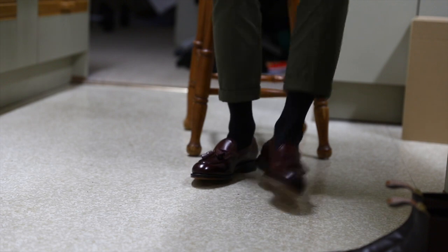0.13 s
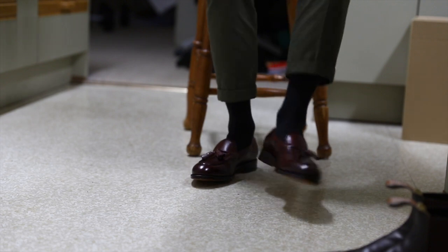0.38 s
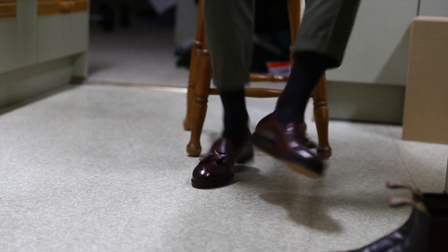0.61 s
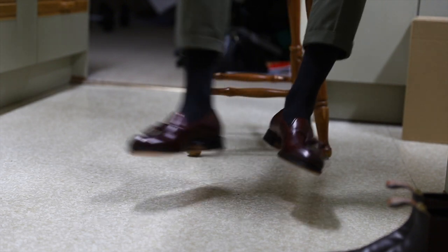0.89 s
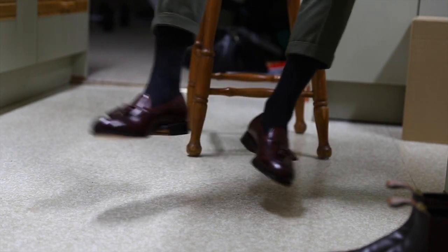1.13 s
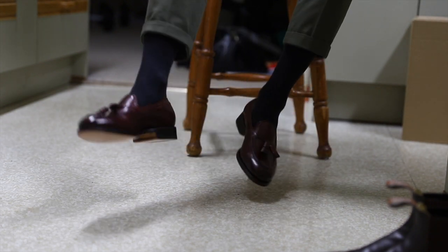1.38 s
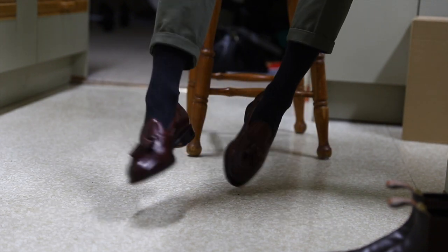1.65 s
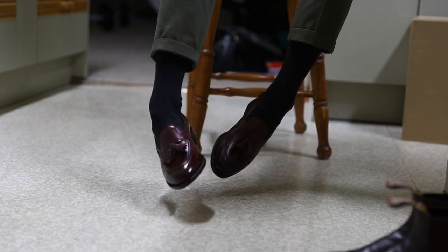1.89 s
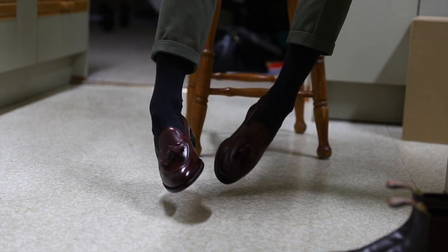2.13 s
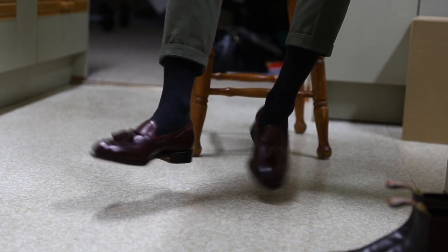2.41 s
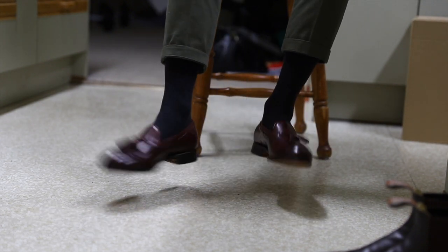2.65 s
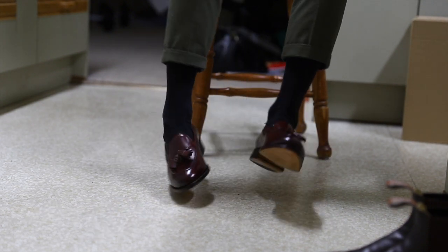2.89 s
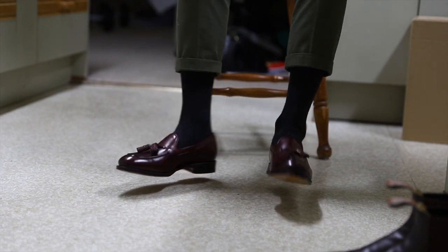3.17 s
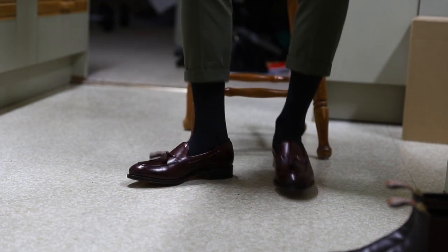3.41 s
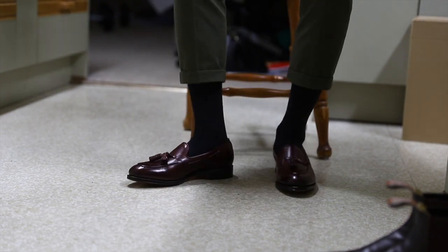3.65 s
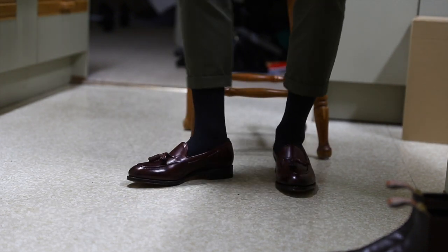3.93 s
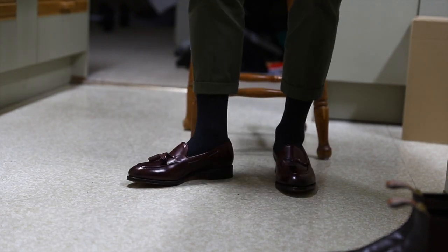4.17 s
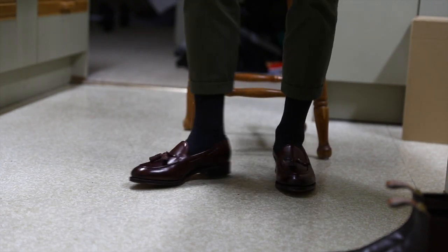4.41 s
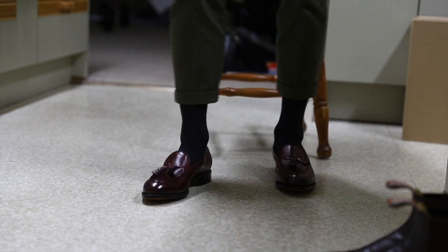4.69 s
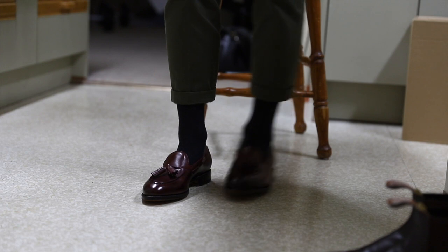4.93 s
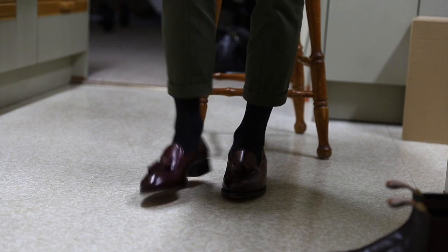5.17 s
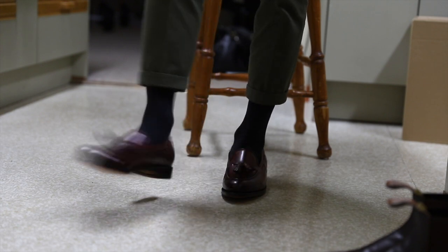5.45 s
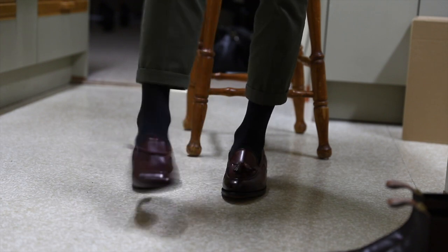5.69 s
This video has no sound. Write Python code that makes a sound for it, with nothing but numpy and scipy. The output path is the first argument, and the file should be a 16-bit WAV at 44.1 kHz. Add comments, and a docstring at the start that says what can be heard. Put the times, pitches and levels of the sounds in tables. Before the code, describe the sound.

Leather shoes land on a hard kitchen floor in a loud quick cluster, between faint cloth rustles, scuffs, a wooden creak-knock and softer steps.

```python
"""A pair of leather shoes is lifted, swung and set down by someone on a wooden stool in a small hard-floored
room. Heels and soles strike the floor: filtered impulses crack and slap, and decaying sines ring the room's low
modes. The stool's joints knock as short rattles through damped wooden modes; leather ticks and a few dull
knocks of the soles sound as brief rounded rings. Cloth and soles rustle and scuff as sparse noise grains, which
also give some knocks and a snap their bright edge; filtered noise gives a soft room hiss and rumble below."""
import sys
import numpy as np
from scipy import signal
from scipy.fft import rfft, irfft, next_fast_len
from scipy.io import wavfile

SR = 44100
rng = np.random.default_rng(int(sys.argv[2]) if len(sys.argv) > 2 else 0)


def attenuation_scalar(level_db):
    """Turn a level in dB into a linear amplitude multiplier (20 dB per decade)."""
    decades = np.asarray(level_db, float) / 20
    return 10 ** decades


def store_pcm(level_fs):
    """Save levels as 16-bit WAV."""
    pcm = np.round(np.clip(level_fs, -1, 1) * 32767).astype(np.int16)
    wavfile.write(sys.argv[1], SR, np.atleast_2d(pcm).T)


N = 256954

# heel or sole meets the floor, relative strengths of the sole's slap, the hard edge's knock and the weight's thud:
# (time [s], slap [dB], knock [dB], thud [dB])
FOOTFALLS = [(.004, -39.5, -42.5, -34.5), (.362, -38.5, -37, -51), (.554, -34, -31, -23),
             (.574, -30, -35, -32.5), (0.597, -50, -32, -28.5), (3.5079, -14, -11, -20.5),
             (3.5184, -14, -42, -21), (3.5589, -13, -13.5, -47), (3.569, -9, -46, -31),
             (3.580, -13, -44, -33), (3.6122, -15, -51, -42), (3.644, -36, -37, -31),
             (3.699, -27, -30.5, -56), (4.628, -40, -56, -43), (4.6988, -20, -17, -26),
             (4.7121, -16.5, -58, -37), (4.755, -31.5, -49, -36), (5.079, -30, -39.5, -27.5),
             (5.1, -22, -26, -30), (5.114, -21.5, -63, -37), (5.164, -34, -61, -46)]


def rms_one(x):
    """Normalisation of power: scales to unit rms."""
    return x / np.sqrt(np.mean(x ** 2) + 1e-20)


def at_hz(points, hz):
    """Interpolation of a spectrum table on a logarithmic frequency axis."""
    table_hz, values = np.array(points).T
    return np.interp(np.log(hz + 1), np.log(table_hz), values)


def coloured(x, spectrum):
    """Linear filtering: multiplies the Fourier spectrum by a table of (frequency [Hz], gain [dB])."""
    size = next_fast_len(x.shape[-1])
    hz = np.fft.rfftfreq(size, 1 / SR)
    shaped = rfft(x, size) * attenuation_scalar(at_hz(spectrum, hz))
    return irfft(shaped, size)[..., :x.shape[-1]]


def band_pass(x, low, high):
    """Butterworth band-pass filtering, maximally flat between its edges in Hz."""
    edges = [max(low, 20), min(high, .45 * SR)]
    return signal.sosfilt(signal.butter(2, edges, "band", fs=SR, output="sos"), x)


def drift(rate):
    """Slow random fluctuation: one-pole low-pass noise with its corner at rate [Hz], unit rms."""
    knots_per_s = 60
    knots = rng.standard_normal(int(N / SR * knots_per_s) + 2)
    r = np.exp(-2 * np.pi * rate / knots_per_s)
    slow = rms_one(signal.lfilter([1], [1, -r], knots))
    return np.interp(np.arange(N) / SR * knots_per_s, np.arange(len(slow)), slow)


def swells(rows):
    """Gaussian envelopes: a sum of bell-shaped gains from (time [s], level [dB], half length [s])."""
    t = np.arange(N) / SR
    return sum(attenuation_scalar(db) * np.exp(-((t - s) / half_s) ** 2) for s, db, half_s in rows)


def impulses(times, gains):
    """Impulsive excitation: a train of single-sample clicks."""
    out = np.full(N, 1e-18)   # a trace keeps the resonators clear of denormal numbers
    np.add.at(out, np.round(np.asarray(times) * SR).astype(int), gains)
    return out


def ring(clicks, hz, t60):
    """Damped resonance: a two-pole filter turns a unit click into a decaying sine of height 1."""
    r = attenuation_scalar(-60 / (max(t60, .001) * SR))
    w = 2 * np.pi * hz / SR
    return signal.lfilter([0, np.sin(w)], [1, -2 * r * np.cos(w), r * r], clicks)


def stereo_bands(length):
    """Spatial coherence: half-octave bands of stereo noise, alike in the bass, unrelated in the treble."""
    # left-right coherence of diffuse sound: (frequency [Hz], correlation [0 to 1])
    coherence = [(60, 0.99), (200, 0.79), (400, 0.67), (800, 0.38), (2000, 0.043), (5000, 0.022),
                 (12000, 0.027)]
    edges_hz = 20 * 2 ** np.arange(0, 10, .5)
    white = rng.standard_normal((2, 2, length))
    for k, (low, high) in enumerate(zip(edges_hz, edges_hz[1:])):
        # neighbouring bands use independent noise
        mid, side = signal.sosfilt(signal.butter(2, [low, high], "band", fs=SR, output="sos"), white[k % 2])
        hz = np.sqrt(low * high)
        alike = np.clip(at_hz(coherence, hz), 0, 1)
        yield hz, np.sqrt(1 + alike) * mid + np.sqrt(1 - alike) * side * [[1], [-1]]


def grit(length):
    """Shot noise: dense random grains of uneven size, partly alike in both channels."""
    spread_db = 2.7 * np.minimum(rng.exponential(1, (2, length)), 5)
    sizes = attenuation_scalar(spread_db) * rng.standard_normal((2, length))
    grains = sizes * (rng.random((2, length)) < 5000 / SR)   # 5000 grains per second on average
    return grains + 0.11 * grains[::-1]


def air():
    """Broadband noise: hiss over a wavering rumble that gathers at the lowest mode and swells after each thud."""
    # spectral shape of the room noise: (frequency [Hz], relative level [dB per Hz])
    air_colour = [(12, -52), (20, -15.5), (85, 3), (137, -20.5), (172, -14), (192, -25.5), (227, -14.5),
                  (284, -19), (637, -20), (713, -21), (969, -21.5), (1210, -23.5), (7030, -32),
                  (15800, -45)]
    # the rumble swells now and then: (time [s], level [dB], half length [s])
    rumble_swells = [(1.45, -56, 0.14), (1.85, -59, 0.16), (2.4, -53.5, 0.099), (3.0, -53.5, 0.32),
                     (4.42, -51, 0.08)]
    bands = list(stereo_bands(N))
    rumble = rms_one(coloured(sum(band for hz, band in bands if 55 < hz < 120), air_colour))
    deep = rms_one(coloured(sum(band for hz, band in bands if hz < 55), air_colour))
    uneven = sum(band * attenuation_scalar(.7 * drift(8)) for hz, band in bands if hz >= 120)
    hiss = rms_one(coloured(uneven, air_colour))
    # the floor goes on shaking after a thud, greatest after 0.07 s
    s, _, _, thud_db = np.transpose(FOOTFALLS)
    part = np.arange(SR) / SR / 0.07
    shake = signal.fftconvolve(impulses(s, attenuation_scalar(thud_db - 28)), part * np.exp(1 - part))[:N]
    level = attenuation_scalar(-60.5 + 5 * drift(1.6)) + swells(rumble_swells) + shake
    return level * rumble + attenuation_scalar(-63) * deep + attenuation_scalar(-54) * hiss


def room(x):
    """Diffuse reverberation: convolution with noise that builds up in a few ms and decays band by band."""
    # reverberation time: (frequency [Hz], t60 [s])
    decay_times = [(100, 0.63), (300, 0.54), (1000, 0.5), (3000, 0.54), (7000, 0.58), (14000, 0.71)]
    t = np.arange(SR) / SR
    tail = sum(band * attenuation_scalar(-60 * t / at_hz(decay_times, hz)) for hz, band in stereo_bands(SR) if hz > 150)
    lumps_db = 2 * drift(21)[:SR]   # reflections arrive unevenly
    early_db = 3 * np.exp(-t / 0.047)   # the first ones are stronger
    build_up = np.clip((t - .003) / 0.0041, 0, 1)
    tail = tail * attenuation_scalar(lumps_db + early_db) * build_up
    tail = tail / np.sqrt(np.sum(tail ** 2) / 2)   # unit energy per channel on average
    return signal.fftconvolve(x[None], tail, axes=1)[:, :N]


def rustle():
    """Stick-slip friction: clumped grains of fibres catching and letting go as a leg moves and cloth rubs."""
    # strokes of the cloth: (time of fastest motion [s], level before the treble lift [dB], half length [s])
    strokes = [(.15, -51, 0.39), (.43, -41.5, 0.072), (.52, -48, 0.035), (.6, -56, 0.092),
               (.74, -48.5, 0.19), (1.05, -59.5, 0.17), (4.64, -54.5, 0.036), (5.45, -55.5, 0.13),
               (5.74, -54.5, 0.088)]
    # spectral shape before the treble lift: (frequency [Hz], relative level [dB per Hz])
    cloth_colour = [(180, -14), (300, 2.5), (384, -7), (484, -5.5), (937, -4.5), (1420, -5), (2100, -6),
                    (7140, -21), (15500, -22.5)]
    grains = rms_one(coloured(grit(N) * attenuation_scalar(2.5 * drift(17)), cloth_colour))
    top = signal.sosfilt(signal.butter(2, 4000, "high", fs=SR, output="sos"), grains)
    return swells(strokes) * (grains + (attenuation_scalar(6.5) - 1) * top)   # treble lifted by 6.5 dB


def scuffs():
    """Sliding friction: a sole or cuff catches and slides, each stroke starting abruptly and fading. The bright
    strokes at 3.893 and 3.972 s are the treble of the stool's joint knocks, and the one at 4.862 s is the sharp
    snap of a footfall."""
    # strokes, including the stool's bright knocks near 3.9 s and a footfall's snap at 4.862 s: (time [s], rms
    # level before the fade [dB], fade time constant [ms], centre frequency [Hz])
    slides = [(0.121, -45.5, 8.3, 1940), (0.362, -58, 11, 1830), (0.388, -29.5, 6.4, 2000),
              (0.424, -41, 4.4, 2460), (0.448, -52, 4, 2460), (0.471, -25.5, 8.7, 6030),
              (0.572, -33.5, 7.6, 4060), (0.688, -36, 21, 5000), (0.706, -31, 16.5, 3500),
              (0.793, -30.5, 3.9, 3500), (0.948, -49.5, 65, 1080), (1.031, -32.5, 2.5, 6050),
              (3.043, -40, 3.7, 5000), (3.893, -37.5, 29, 7950), (3.972, -32.5, 4.3, 7960),
              (4.416, -46, 12, 1190), (4.862, -40, 3.4, 3500), (5.462, -42, 3.9, 7000),
              (5.487, -40, 5.5, 4300), (5.665, -37, 19, 3500), (5.694, -38, 11, 3000)]
    out, t = np.zeros((2, N + SR)), np.arange(SR // 5) / SR
    for s, level_db, ms, hz in slides:
        # short catches are narrow, longer slides wide: octaves on either side of the centre
        octaves = 0.5 + 1.58 * np.tanh((ms / 10) ** 2)
        stroke = rms_one(band_pass(grit(len(t)), hz / 2 ** octaves, hz * 2 ** octaves))
        envelope = np.minimum(t / .0035, 1) * np.exp(-t / (ms / 1000))
        i = round(s * SR)
        out[:, i:i + len(t)] += attenuation_scalar(level_db) * stroke * envelope
    return out[:, :N]


def knocks_and_ticks():
    """Transient vibration: a brief rounded ring with two weaker overtones; leather and tassels tick, and near
    0.56 s the soles knock dully on the floor."""
    # ticks and dull knocks: (time [s], level of the lowest partial [dB], its frequency [Hz])
    knock_and_tick_rows = [(.509, -30, 710), (.556, -29.5, 680), (.575, -32.5, 695), (.628, -39, 800),
                           (.636, -31.5, 965), (.691, -32.5, 4920), (0.922, -40, 1970), (1.031, -36.5, 3500),
                           (1.185, -45, 1450), (4.417, -44, 1430), (5.375, -41.5, 1400), (5.426, -29.5, 693),
                           (5.437, -31.5, 660), (5.448, -40.5, 800), (5.462, -49, 1020), (5.695, -37.5, 3500),
                           (5.702, -36, 986)]
    out, t = np.zeros(N), np.arange(SR // 20) / SR
    for s, level_db, hz in knock_and_tick_rows:
        shape = np.sin(2 * np.pi * hz * t)
        shape += .5 * np.sin(2 * np.pi * 1.37 * hz * t)
        shape += 0.34 * np.sin(2 * np.pi * 1.98 * hz * t)
        part = t / (.0005 + .8 / hz)   # the envelope peaks after a fixed time plus part of a cycle
        i = round(s * SR)
        out[i:i + len(t)] += attenuation_scalar(level_db) * part * np.exp(1 - part) * shape
    return out


def stool():
    """Modal synthesis: a joint's short rattle rings the frame's wooden modes; load shifts the upper ones."""
    # a joint knocks under shifting weight: (time [s], relative level [dB], boost of modes above 1100 Hz [dB])
    joint_knocks = [(.264, -27, -7), (0.293, -37.5, -9), (3.895, -17.5, 5.5), (3.910, -11.5, -5.5),
                    (3.948, -28, 5.5), (3.977, -22.5, 3.5), (3.990, -28, 3), (4.031, -34.5, 0.5)]
    # modes of the frame before the load shift: (frequency [Hz], relative level [dB], t60 [s])
    frame_modes = [(660, -29.5, .03), (781, -13, 0.064), (918, -2, 0.05), (1006, -13, 0.037),
                   (1230, -9, 0.032), (1523, 1, 0.013), (2120, 8.5, 0.0057), (2520, 0, 0.0094),
                   (2614, -3, 0.027), (3500, 3, 0.0044), (3970, -22, .006), (4670, -14, 0.015),
                   (5000, -9.5, 0.013), (6500, -11, 0.0035)]
    settles_s = 3.96   # the frame takes the full load
    reference_hz, loose_hz, loaded_hz = 2560, 2487, 2720   # strongest upper mode: nominal, before, after
    out, t = np.zeros(N), np.arange(SR // 5) / SR
    hz, level_db, t60 = np.transpose(frame_modes)[:, :, None]
    spread_db = 2 * rng.standard_normal((len(joint_knocks), len(frame_modes), 1))
    slips = rng.standard_normal((len(joint_knocks), len(t)))
    slips = slips * (rng.random(slips.shape) < 500 / SR)   # 500 slips per second on average
    for (s, knock_db, upper_db), own_db, slip in zip(joint_knocks, spread_db, slips):
        shift = (loaded_hz if s > settles_s else loose_hz) / reference_hz
        pitch = hz * shift ** (hz > 2000)
        decay_db = level_db + own_db + (hz > 1100) * upper_db - 60 * t / t60
        rings = attenuation_scalar(decay_db) * np.sin(2 * np.pi * pitch * t)
        rounded = rings.sum(axis=0) * (1 - np.exp(-t / 0.00068))
        rattle = (t == 0) + 0.34 * slip * np.exp(-t / 0.027)
        i = round(s * SR)
        out[i:i + len(t)] += attenuation_scalar(knock_db - 8) * signal.fftconvolve(rounded, rattle)[:len(t)]
    return out


def footfalls():
    """Impact excitation: hard leather snaps and knocks, the sole slaps dully, and the blow rings the low modes."""
    # low modes of room and floor: (frequency [Hz], relative level [dB], t60 [s], left minus right [dB])
    low_modes = [(81, 6, 0.22, 1), (103, -12.5, 0.51, -1), (126.6, -8.5, 0.77, 2), (163.8, -7, 0.63, 2),
                 (200.7, -4, 0.22, 0), (244, -6, 0.34, -5), (305, -5.5, 0.13, 8), (307.5, -5.5, 0.49, 3.5),
                 (328.6, -2.5, 0.3, 0), (389.6, -8, 0.22, 0), (481, -7, 0.13, 7.5),
                 (538.4, -10.5, 0.48, -5), (699, -11.5, 0.45, 3), (749.5, -10, 0.27, 3),
                 (880, -11, 0.08, -5)]
    s, slap_db, knock_db, thud_db = np.transpose(FOOTFALLS)
    snap_db = -16 + 2.27 * (knock_db + 13.5)   # only firm knocks have a sharp edge
    pan_db = 0.5 * rng.standard_normal(len(s))   # left minus right
    halves = np.array([[.5], [-.5]])

    t = np.arange(SR // 50) / SR
    contact = band_pass(1. * (t == 0), 380, 5530)
    knock = signal.lfilter(*signal.butter(2, 1150, fs=SR), contact)   # the dull part of the contact
    knock = knock / np.abs(knock).max()
    snap = signal.lfilter(*signal.butter(1, 1500, "high", fs=SR), contact)   # its sharp edge
    heel_cap = np.sin(2 * np.pi * 2700 * t) * np.exp(-t / 0.00014)   # rings briefly
    snap = snap / np.abs(snap).max() + 1.5 * heel_cap
    snap = snap / np.abs(snap).max()
    slap = np.sin(2 * np.pi * 380 * t) * np.exp(-t / 0.001)

    near, fed = np.zeros((2, N)), np.zeros(N)   # direct sound, and what drives the reverberation
    for k, burst in enumerate(rng.standard_normal((len(s), 2, len(t)))):
        click = attenuation_scalar(knock_db[k]) * knock - attenuation_scalar(snap_db[k]) * snap
        settling = (t == 0) + 0.27 * burst * np.exp(-t / 0.0018)   # the edge settles in a few ms
        chatter = signal.fftconvolve(click[None], settling, axes=1)[:, :len(t)]
        i = round(s[k] * SR)
        near[:, i:i + len(t)] += (chatter + slap * attenuation_scalar(slap_db[k] + 4.0)) * attenuation_scalar(pan_db[k] * halves)
        fed[i:i + len(t)] += click * attenuation_scalar(-2.5) + slap * attenuation_scalar(slap_db[k])

    modes = np.zeros((2, N))
    spread_db = 2 * rng.standard_normal((len(s), len(low_modes)))   # each spot drives the modes differently
    for k, (hz, level_db, t60, side_db) in enumerate(low_modes):
        blow_db = thud_db if hz < 220 else slap_db if hz < 520 else knock_db
        sign = -1 if k % 3 == 1 else 1
        blows = impulses(s, attenuation_scalar(blow_db + level_db + spread_db[:, k]))
        modes += sign * ring(blows, hz, t60) * attenuation_scalar(side_db * halves)
    modes = signal.lfilter([.07], [1, -.93], modes)   # the contact is soft: the onset is rounded
    # a small room carries little below its lowest mode
    no_deep = signal.butter(4, 62, "high", fs=SR, output="sos")
    return signal.sosfilt(no_deep, near + attenuation_scalar(-5) * modes), fed


def scene():
    """Superposition: all sources, direct and through the room, a little dulled on the way, over the air."""
    steps, steps_fed = footfalls()
    frame, leather, rubbing = stool(), knocks_and_ticks(), rustle() + scuffs()
    fed = attenuation_scalar(7.5) * steps_fed + attenuation_scalar(-0.5) * frame
    fed += attenuation_scalar(-14) * leather + attenuation_scalar(-2) * rubbing.mean(axis=0)
    events = steps + frame * attenuation_scalar([[-1], [1]]) + leather + rubbing + room(fed)
    return signal.sosfilt(signal.butter(2, 7960, fs=SR, output="sos"), events) + air()


def roll_off(x):
    """The treble ends steeply here."""
    return signal.sosfilt(signal.butter(12, 15800, fs=SR, output="sos"), x)


def record(dry):
    """Saturation: the microphone favours the left a little, and loud peaks are rounded."""
    heard = dry * attenuation_scalar([[.3], [-.3]])
    mix = 1.705 * np.tanh(heard / 1.312)
    return roll_off(mix)


dry = scene()
out = record(dry)
store_pcm(out)
```